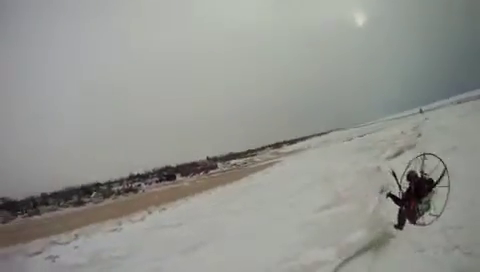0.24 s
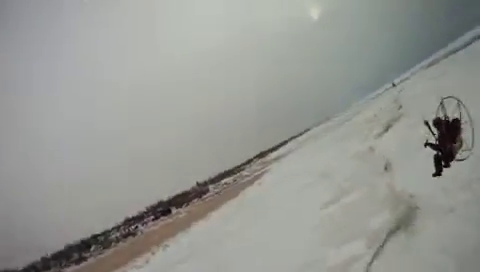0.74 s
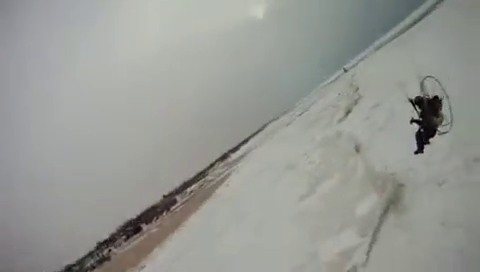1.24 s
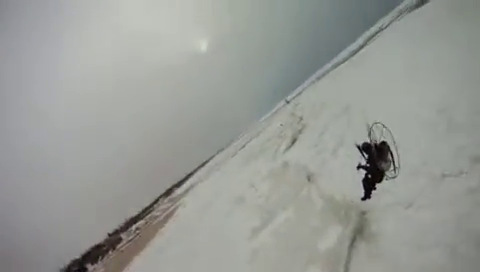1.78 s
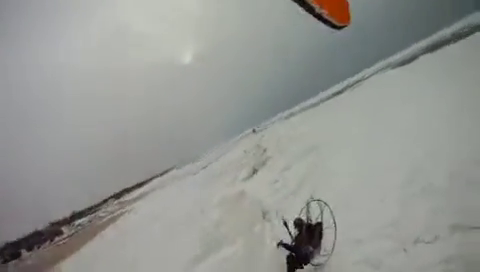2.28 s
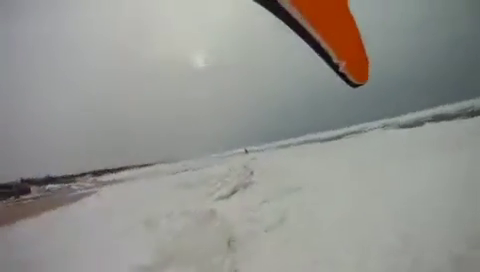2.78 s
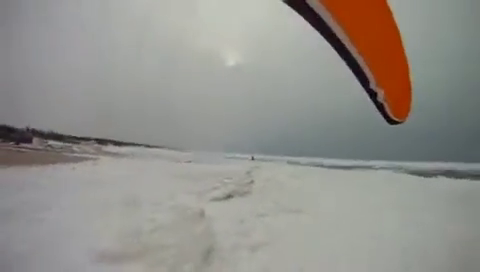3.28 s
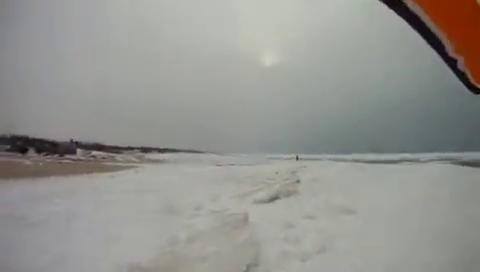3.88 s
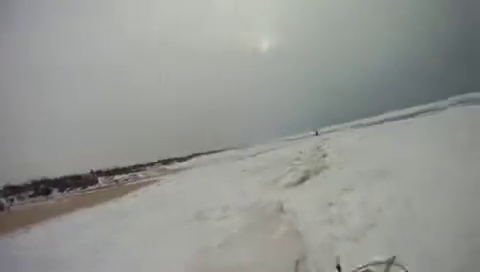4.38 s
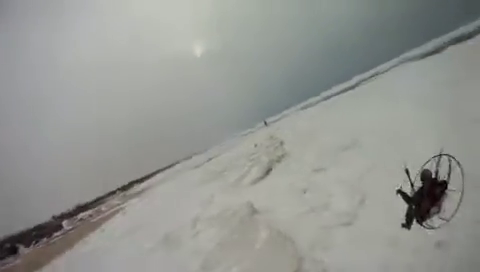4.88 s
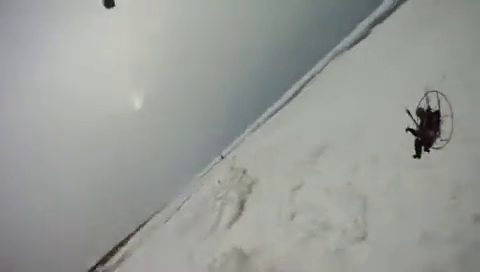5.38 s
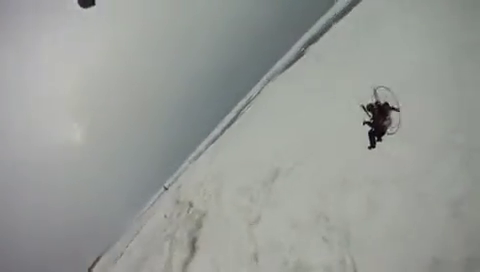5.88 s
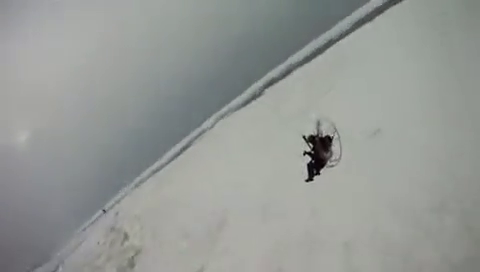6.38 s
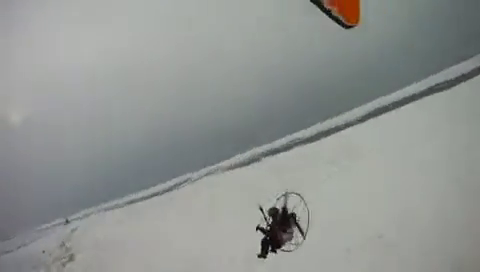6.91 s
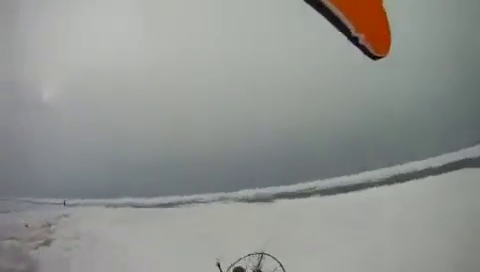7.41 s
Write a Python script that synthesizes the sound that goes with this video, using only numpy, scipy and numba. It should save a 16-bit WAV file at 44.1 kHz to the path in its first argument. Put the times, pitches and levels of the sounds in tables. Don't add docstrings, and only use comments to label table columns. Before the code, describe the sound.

Raspy paramotor drone outdoors, its airy whistling tone rising and fading, with low wind buffeting and fluttery humming gusts throughout.

```python
import sys
import numpy as np
from scipy import signal
from scipy.fft import rfft, irfft
from scipy.io import wavfile
from scipy.ndimage import uniform_filter1d
from numba import njit

SR = 44100
rng = np.random.default_rng(int(sys.argv[2]) if len(sys.argv) > 2 else 0)


def transcribe(u):
    v = np.clip(np.atleast_2d(u).T, -1, 1)
    q = np.round(v * 32767).astype(np.int16)
    wavfile.write(sys.argv[1], SR, q)


def ratio_of_db(decibels):
    return 10 ** (np.asarray(decibels, float) / 20)


N = 337365


def unit(x):
    return x / np.sqrt(np.mean(x ** 2))


def curves(table):
    s, *columns = np.transpose(table)
    return [np.interp(np.arange(N) / SR, s, column) for column in columns]


def walk(rate):
    hold = int(SR / rate)
    steps = np.repeat(rng.standard_normal(N // hold + 1), hold)
    smooth = uniform_filter1d(uniform_filter1d(steps, hold), hold)
    return unit(smooth[:N])


def ring(x, modes):
    hz = np.arange(4097) * SR / 8192
    power = sum(ratio_of_db(2 * db) / (1 + (2 * (hz - f) / width) ** 4) for f, width, db in modes)
    cepstrum = irfft(np.log(power + 1e-7) / 2)
    cepstrum[1:4096] *= 2
    cepstrum[4097:] = 0
    fade = np.hanning(8192)[4096:]
    response = irfft(np.exp(rfft(cepstrum)))[:4096] * fade
    return signal.oaconvolve(x, response)[:N]


@njit
def moving_resonance(x, hz, width):
    y, band, low = np.empty(len(x)), 0., 0.
    for i in range(len(x)):
        g, damping = np.tan(np.pi * hz[i] / SR), width / hz[i]
        v = (band + g * (x[i] - low)) / (1 + g * (g + damping))
        band, low, y[i] = 2 * v - band, low + 2 * g * v, damping * v
    return y


def bells(table):
    t = np.arange(N) / SR
    return [(db, np.exp(-4.6 * ((t - s) / max(length, .02)) ** 2)) for s, db, length in table]


# time in seconds, turn to the engine, airspeed, tip, roll
SWING = [(0.0, -0.31, 0.16, 0.24, 0.14), (0.45, -0.46, -0.049, -0.48, 0.024),
         (0.9, -0.13, -0.31, -0.65, -0.15), (1.35, -0.37, -0.62, -0.69, -0.18),
         (1.8, -1.0, -1.02, -0.2, -0.69), (2.25, -0.6, -0.37, -0.16, -0.13),
         (2.7, 0.063, -0.11, 0.051, 0.65), (3.15, 0.56, -0.13, 0.35, 0.19),
         (3.6, 0.73, 0.042, 0.33, 0.0069), (4.05, 0.34, 0.25, 0.73, 0.018), (4.5, 0.33, 0.31, 0.47, 0.35),
         (4.95, -0.34, 0.15, -0.16, 0.26), (5.4, 0.073, 0.53, -0.69, 0.19),
         (5.85, -0.021, 0.36, -0.33, -0.31), (6.3, 0.26, 0.31, -0.11, -1.1),
         (6.75, -0.31, 0.49, -0.067, -0.23), (7.2, 0.14, 0.33, 0.3, 0.74), (7.65, 0.3, 0.38, 0.65, 0.53)]


def swing():
    return np.array(curves(SWING))


# centre in seconds, depth in dB, length in seconds.
LULLS = [(.68, -6, 0.055), (1.09, -4, .08), (2.0, -2.5, 0.33), (2.6, -8, 0.065), (2.88, -7, 0.071),
         (3.66, -8, 0.18), (4.7, -6, 0.11), (5.45, -9, 0.051), (5.85, -15, 0.061), (6.32, -14, 0.057),
         (6.49, -5, 0.19), (7.43, -1, 0.063)]


def lulls_db():
    return sum(db * bell for db, bell in bells(LULLS))


# centre in Hz, width in Hz, level in dB.
RUMBLE = [(30, 16, -7), (64.5, 25, 4), (124.8, 44, 11.5), (189, 61, -2.5), (260, 37, -8), (323, 50.4, -0.5),
          (387, 57, 0), (434, 48, -6), (507, 37, -13.5)]
ROAR = [(607, 160, -22), (735, 196, -8), (855, 72, 3), (968, 106, 2.5), (1090, 75, -6.5), (1240, 78, -10.5)]
# mean in dB, slope in dB per unit of airspeed.
RUMBLE_LEVEL = (-42, 8)
ROAR_LEVEL = (-44, 9)


def airstream():
    airspeed = swing()[1]
    rumble_db, roar_db = (db + slope * airspeed for db, slope in (RUMBLE_LEVEL, ROAR_LEVEL))
    rumble_db = rumble_db + 7.5 + 0.19 * lulls_db() + 0.55 * walk(10)
    roar_db = roar_db + 0.76 * walk(10)
    rumble = unit(ring(rng.standard_normal(N), RUMBLE))
    roar = unit(ring(rng.standard_normal(N), ROAR))
    return ratio_of_db(rumble_db) * rumble + ratio_of_db(roar_db) * roar


# frequency in Hz, width in Hz, steadiness from 0 to 1.
MOUNT_MODES = [
    (135.2, 16, 0.68),
    (166.8, 20, 0.72),
    (40.7, 14, 0.5),
]
# mean in dB, slope in dB per unit of airspeed, share of the lulls 0 to 1.
BUFFET = [
    (-33.5, 5.5, 1),
    (-41, 3, 0.1),
    (-43, 3, .3),
]
# centre in seconds, peak in dB, length in seconds.
HUM_GUSTS = [(0.227, -25, 0.13), (0.475, -31, 0.048), (0.556, -31, 0.052), (0.762, -28.7, 0.051),
             (0.837, -28, 0.053), (0.948, -24, 0.12), (1.19, -24, 0.048), (1.47, -31, 0.048),
             (1.615, -33.5, 0.07), (2.7, -30, 0.049), (3.47, -25, 0.11), (3.8, -33, 0.093),
             (3.938, -32, 0.055), (4.04, -23.5, 0.065), (4.18, -21.5, 0.034), (4.373, -23.4, 0.081),
             (4.513, -24.5, 0.1), (4.796, -28, 0.046), (4.938, -32, 0.065), (5.135, -20, 0.09),
             (5.293, -22.5, 0.068), (5.553, -29, 0.081), (5.657, -25.5, 0.1), (5.983, -22.8, 0.078),
             (6.15, -24.5, 0.092), (6.24, -23.5, 0.08), (6.59, -17.5, 0.048), (7.03, -20, 0.12),
             (7.21, -23, 0.061), (7.583, -18, 0.08)]
SECOND_GUSTS = [(0.18, -30.5, 0.12), (0.34, -30.9, 0.09), (0.43, -34.5, 0.07), (1.17, -35.8, 0.039),
                (1.61, -36.7, 0.2), (4.07, -28.3, 0.068), (4.17, -32, 0.062), (4.39, -32, 0.054),
                (4.85, -32.5, 0.055), (4.93, -30, 0.055), (5.12, -32, 0.058), (5.38, -34, 0.08),
                (5.47, -36, 0.089), (5.61, -36, 0.07), (5.9, -30.0, 0.08), (6.0, -26, 0.08),
                (6.36, -29.5, 0.09), (6.66, -30.5, 0.1), (6.96, -35.5, 0.073), (7.12, -32, 0.07),
                (7.23, -29.9, 0.08), (7.5, -32, 0.07)]
SWAY_GUSTS = [(0.48, -34.8, 0.12), (0.71, -35, 0.09), (0.8, -35.9, 0.08), (1.0, -38.3, 0.08),
              (1.25, -35.3, 0.23), (1.66, -36.7, 0.17), (3.17, -33.5, 0.35), (3.36, -36, 0.17),
              (3.53, -37, 0.14), (3.65, -34, 0.091), (4.22, -35, 0.12), (4.44, -33, 0.11), (4.75, -38, 0.1),
              (4.93, -35.6, 0.1), (5.04, -34.2, 0.12), (5.66, -37, 0.15), (6.29, -39, 0.1),
              (6.42, -35, 0.1), (6.64, -31.0, 0.13), (7.44, -32, 0.13)]


def mount():
    out, airspeed, lulls = 0, swing()[1], lulls_db()
    gust_tables = (HUM_GUSTS, SECOND_GUSTS, SWAY_GUSTS)
    for (hz, width_hz, steady), (db, slope, share), table in zip(MOUNT_MODES, BUFFET, gust_tables):
        phasor = walk(width_hz) + 1j * walk(width_hz)
        phase = 2 * np.pi * hz * np.arange(N) / SR + np.angle(phasor)
        hum = unit(np.abs(phasor) ** np.clip(1 - steady, 0, 1) * np.cos(phase))
        buffet_power = ratio_of_db(2 * (db + slope * airspeed + share * lulls))
        gust_power = sum(ratio_of_db(2 * peak_db) * bell for peak_db, bell in bells(table))
        out = out + np.sqrt(buffet_power + gust_power) * hum
    band = signal.butter(4, [32, 240], "band", fs=SR, output="sos")
    return signal.sosfilt(band, out)


# time in seconds, firing rate in Hz.
FIRING = [(0, 55.75), (.77, 55.7), (1.15, 55.97), (2.04, 57.64), (2.3, 57.7), (2.8, 57.55), (4.08, 57.83),
          (4.7, 57.56), (5.3, 57.66), (5.8, 58.5), (6.4, 59.15), (7.14, 61), (7.4, 61.38), (7.65, 61.44)]


def crank():
    return np.cumsum(curves(FIRING)[0] + .055 * walk(12)) / SR


def gas_puffs(turns):
    strength = ratio_of_db(2 * rng.standard_normal(int(turns[-1]) + 1))[turns.astype(int)]
    puff = np.exp(-(turns % 1) / .2) + .3 * np.exp(-((turns + .5) % 1) / .2)
    return unit(puff * strength * rng.standard_normal(N))


# multiple of the firing rate, lift in dB.
LIFTED = [(12, 4), (16, 5), (22, 4), (25, 6), (26, 4), (28, 4), (29, 7), (32, 4), (33, -3), (36, 3),
          (52, 3), (54, 3), (56, 2), (58, 4)]


def clatter(turns):
    order = np.arange(1025)
    db = np.where(order % 2, -3.5, 0.) - 200 * (order > 90)
    for k, lift_db in LIFTED:
        db[k] += lift_db
    shapes = irfft(ratio_of_db(db) * np.exp(2j * np.pi * rng.random((2, 1025))))
    place = turns % 1 * 2048
    one, other = (unit(np.interp(place, np.arange(2048), shape, period=2048)) for shape in shapes)
    blend = .8 * walk(5)
    return np.cos(blend) * one + np.sin(blend) * other


# start, full and break-off in seconds, lift in dB.
LOCKS = [
    (2.547, 3.096, 4.16, 8.5),
    (6.9, 7.25, 7.9, 6.5),
]


def lock_db():
    t = np.arange(N) / SR
    return sum(db * np.interp(t, [start, full, end, end + 0.043], [0, 1, 1, 0])
               for start, full, end, db in LOCKS)


def path_db(path):
    mean_db, *slopes_db = path
    return mean_db + np.dot(slopes_db, swing())


# centre in Hz, width in Hz, level in dB.
BODY = [(1320, 160, -0.5), (1411, 88, 0), (1525, 82, 0.5), (917, 370, -18), (616, 460, -20.5)]
WHISTLE = [(1850, 55, 0), (1930, 120, -6)]
CAVITY = [(2101, 154, -6.5), (2155, 60, -6.5), (2243, 310, -17.5)]
SLOT = [(1644, 86, 1), (1724, 120, 5), (1960, 33, -16), (2350, 180, 1), (2400, 290, -6), (3694, 81, -4)]
SHELL = [(2900, 102, -29), (3145, 150, 5), (3354, 176, 3.5), (3576, 140, 3.5), (3894, 160, 0),
         (3893, 130, 2), (4000, 2800, -16.5)]
PORT = [(2570, 280, 5), (2777, 196, 5.5), (4320, 310, -5.5)]
LENS_RING = [(5336, 330, -1.5)]
LENS_EDGE = [(5680, 220, 2), (5930, 250, -4)]
RIDGE = [(3231, 150, 0)]
LIP = [(4750, 280, 0)]
# mean in dB, then slopes in dB per unit of turn, airspeed, tip and roll.
PATHS = [
    (-38, 1.2, 4.5, 5, 2.5),
    (-35, 13, 1.5, 0.0, 1.5),
    (-34.5, 0.5, -0.0, 11.5, -0.0),
    (-38, -2.5, 8.5, -2.5, 0),
    (-39, -1.3, 1.5, 4.5, -1.5),
    (-40, 6, 0.2, 2, 4),
    (-45, 0.2, 0, 10.5, 2.5),
    (-50.5, 1.5, -1, -2, 12),
]
EDGE_PATH = (-57, -4, 1, 8, 12)
RIDGE_PATH = (-49, 2, 5.5, 9, -6)
LIP_PATH = (-53.5, -2.5, 0, 6, -2.5)
# time in seconds, rim resonance in Hz, shadow of the case edge in Hz.
SLIDE = [(0, 4750, 2900), (.5, 4600, 2670), (.8, 4750, 2700), (1.15, 5300, 2700), (1.55, 4880, 2690),
         (1.9, 4740, 2930), (2.3, 4920, 2790), (2.55, 5220, 2900), (2.9, 5090, 2860), (3.6, 5090, 2980),
         (4.3, 5110, 2900), (4.85, 4550, 2740), (5.35, 4860, 2640), (5.85, 4850, 2600), (6.6, 4750, 2780),
         (7.1, 5060, 2830), (7.65, 5000, 2880)]


def through_case(knocks, gas):
    turn, _, tip, _ = swing()
    body, whistle, cavity, slot, shell, port, rim_path, lens = PATHS
    whistle_db = path_db(whistle) - 4.0 + lock_db() - 7.5 * turn
    # modes, path level in dB, gas level in dB
    routes = [(BODY, path_db(body), -3.5), (WHISTLE, whistle_db, 1), (CAVITY, path_db(cavity), -8),
              (SLOT, path_db(slot), -2.5), (SHELL, path_db(shell), 1), (PORT, path_db(port), -6.5),
              (LENS_RING, path_db(lens), -5.5), (LENS_EDGE, path_db(EDGE_PATH), -2),
              (RIDGE, path_db(RIDGE_PATH), -11), (LIP, path_db(LIP_PATH), -7)]
    out = 0
    for modes, db, gas_db in routes:
        rush = rng.standard_normal(N)
        drive = rush + knocks + ratio_of_db(gas_db) * gas
        out = out + ratio_of_db(db + 0.51 * walk(14)) * unit(ring(drive, modes))
    rim_hz, shadow_hz = curves(SLIDE)
    rim_drive = rng.standard_normal(N) + knocks + ratio_of_db(-7) * gas
    rim = moving_resonance(moving_resonance(rim_drive, rim_hz, 470.), rim_hz, 470.)
    out = out + ratio_of_db(path_db(rim_path) + 0.78 * walk(10)) * unit(rim)
    shadow_depth = np.clip(.66 - .2 * turn - 0.11 * tip, 0, .95)
    return out - shadow_depth * moving_resonance(out, shadow_hz, 260.)


# time in seconds, level of the repeating part in dB.
CLARITY = [(0, -8), (.6, -5), (2, -4), (2.6, -5), (3.2, -7), (4.2, -8), (5.4, -10), (6.8, -10), (7.65, -8)]


def engine():
    turns = crank()
    gas = gas_puffs(turns)
    knocks = ratio_of_db(curves(CLARITY)[0]) * clatter(turns)
    airborne = through_case(knocks, gas)
    line_db = -45 + 6 * swing()[1] + 2.5 * walk(4)
    line_hum = np.sqrt(2) * np.sin(6 * np.pi * turns)
    return airborne + ratio_of_db(line_db) * line_hum


def scene():
    return (airstream() + mount() + engine())[None]


def roll_off(x):
    return signal.sosfilt(signal.butter(12, 15450, fs=SR, output="sos"), x)


def record(dry):
    camera_hz = 12000
    slow = signal.resample_poly(dry, camera_hz // 300, SR // 300, axis=1)
    steps = np.repeat(slow, 4, axis=1)
    held = signal.resample_poly(steps, SR // 300, 4 * camera_hz // 300, axis=1)
    return roll_off(held[:, :N])


dry = scene()
out = record(dry)
transcribe(out)
```